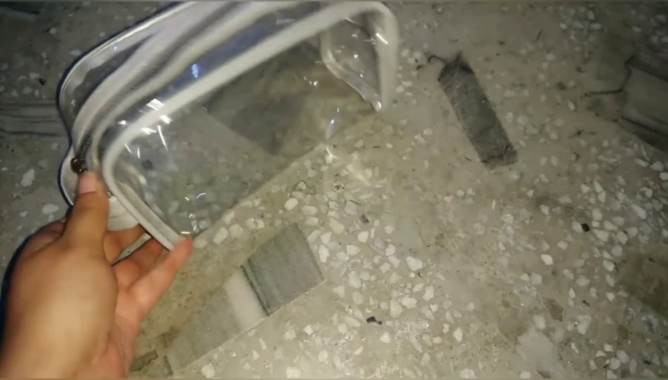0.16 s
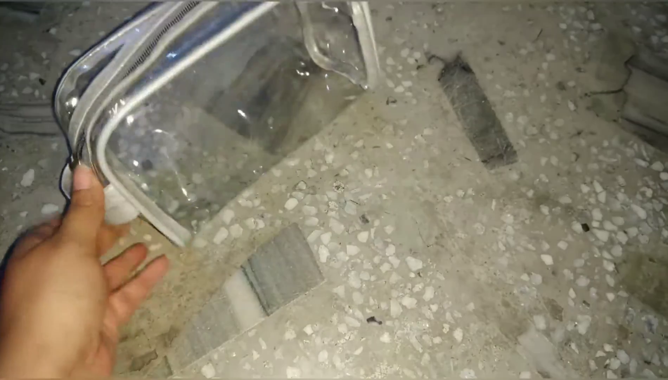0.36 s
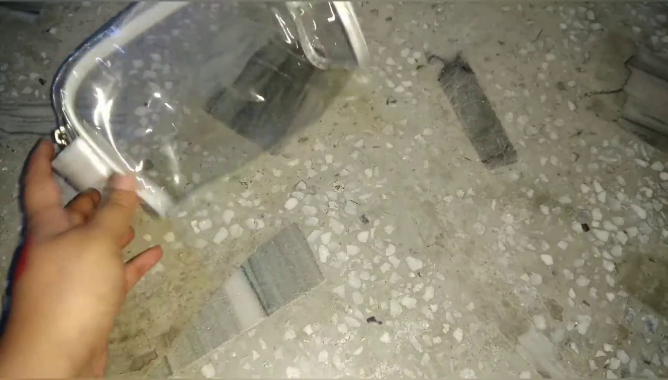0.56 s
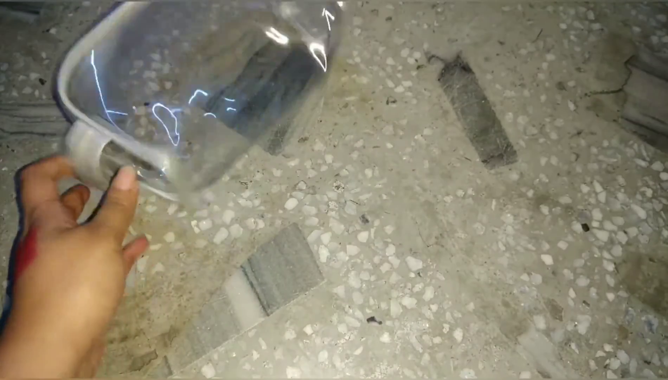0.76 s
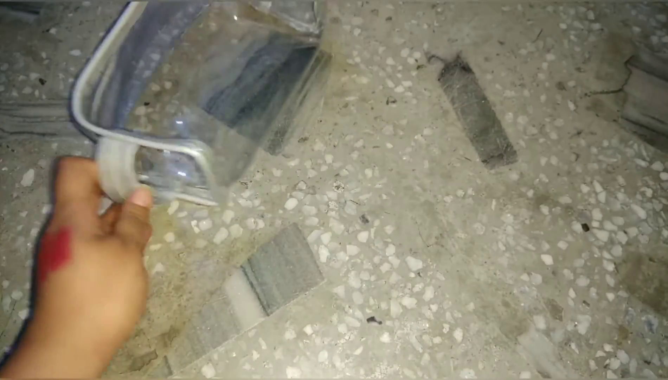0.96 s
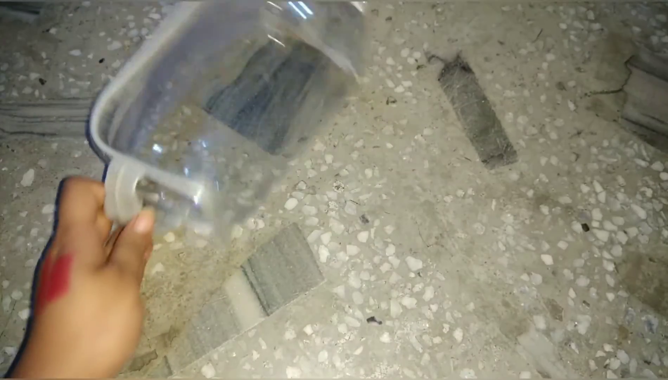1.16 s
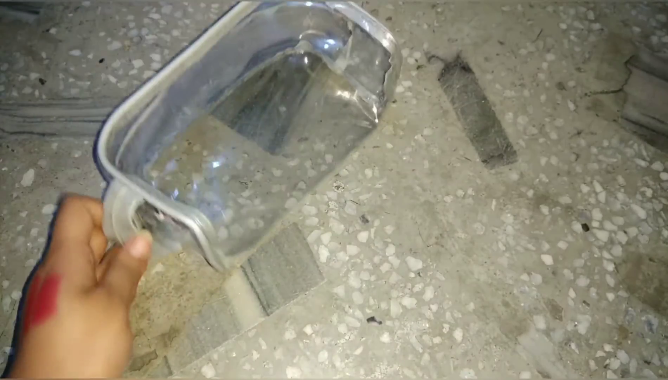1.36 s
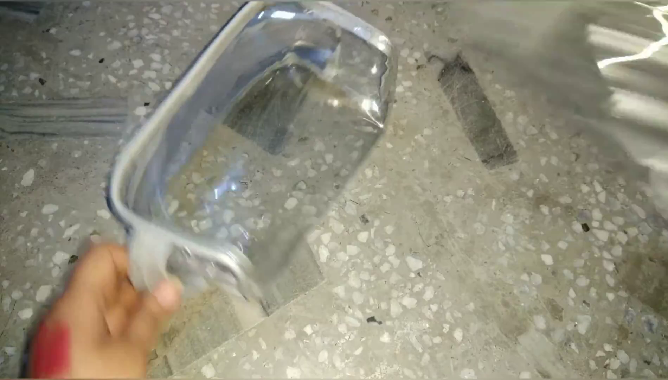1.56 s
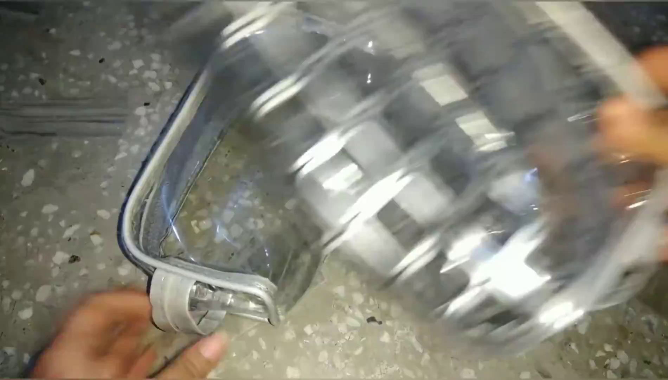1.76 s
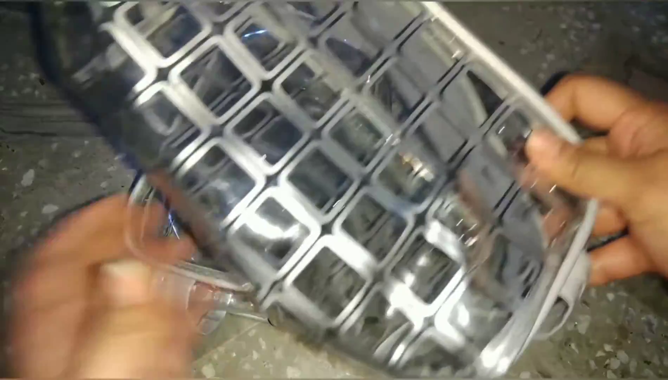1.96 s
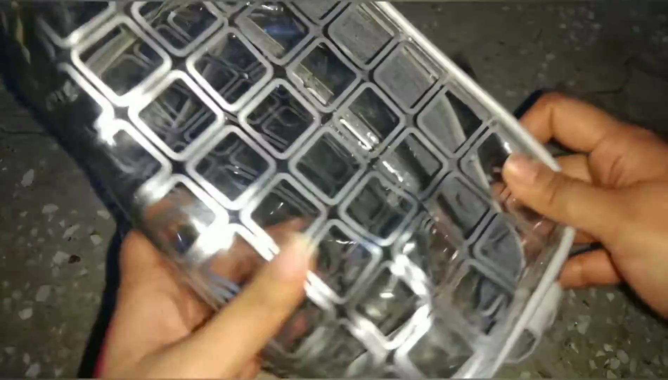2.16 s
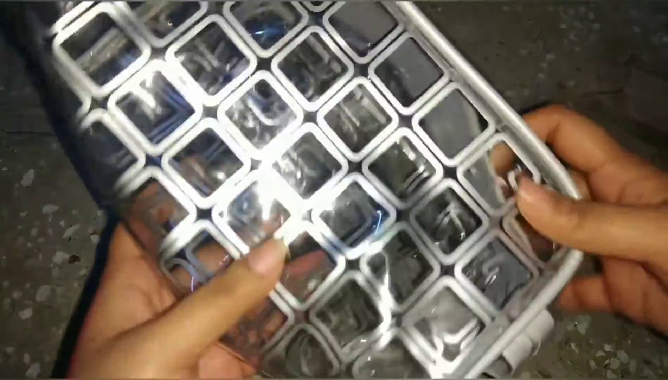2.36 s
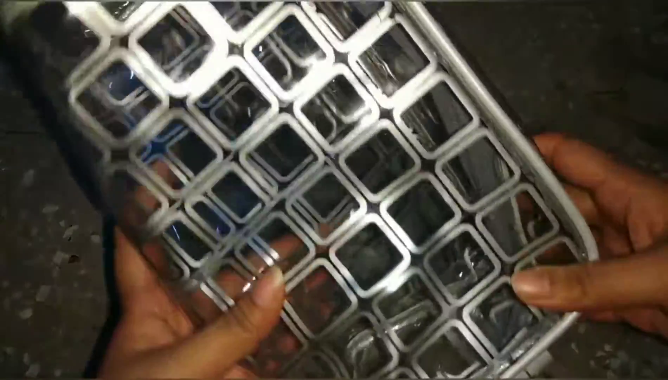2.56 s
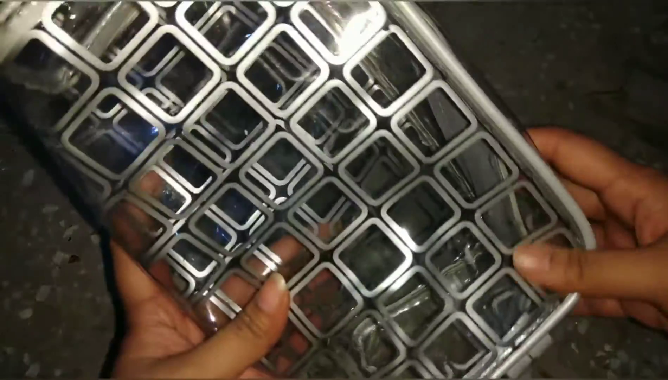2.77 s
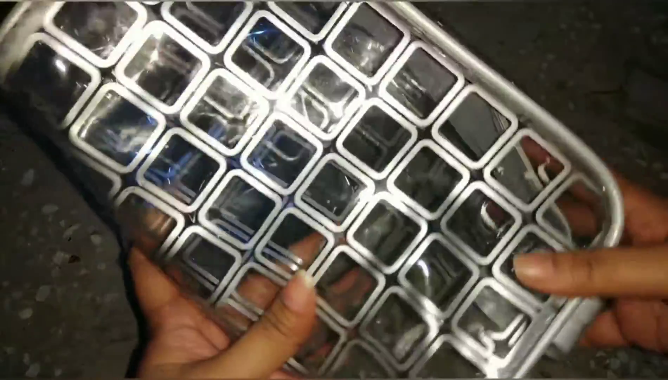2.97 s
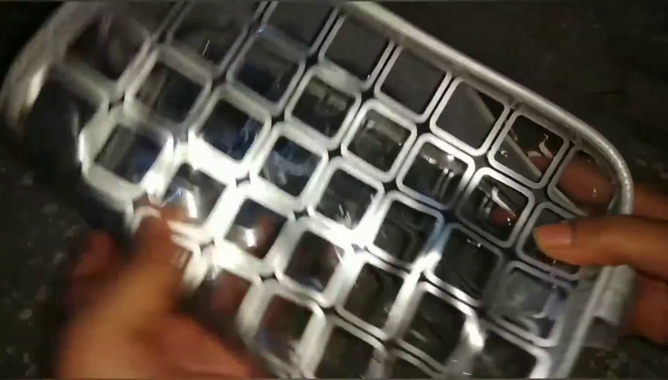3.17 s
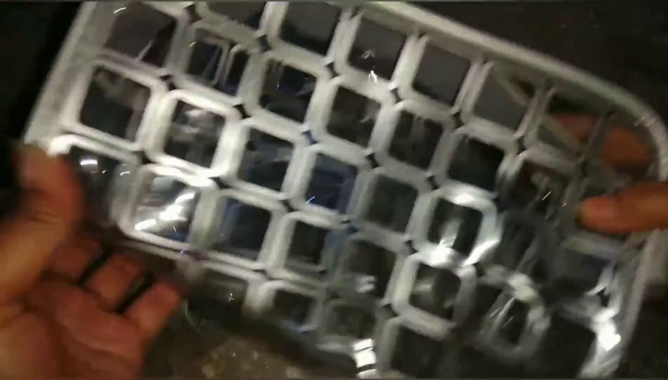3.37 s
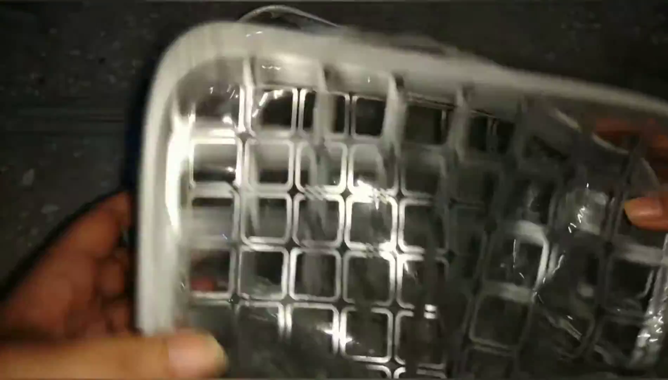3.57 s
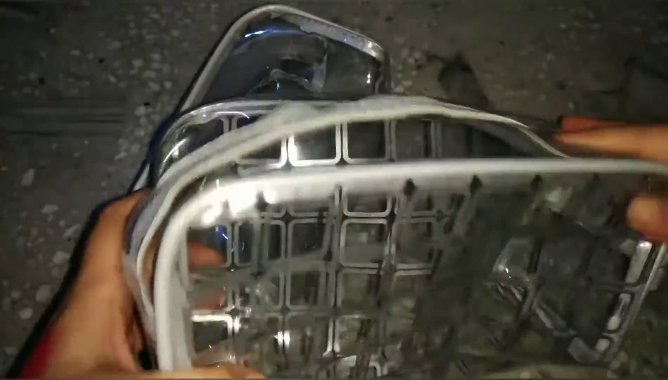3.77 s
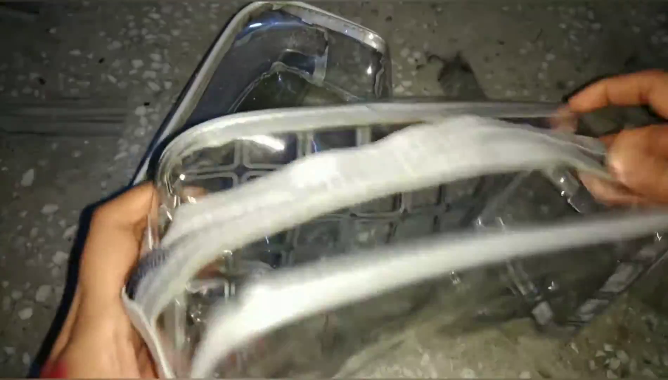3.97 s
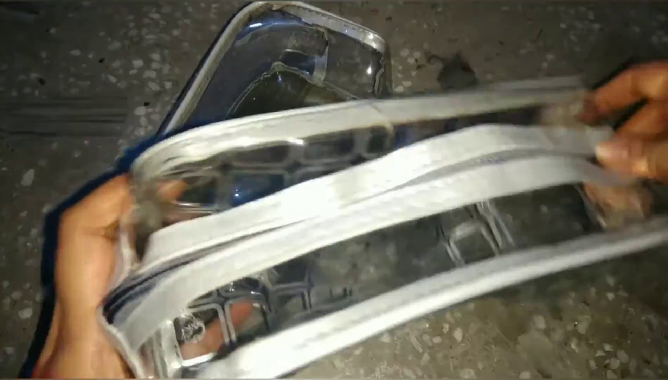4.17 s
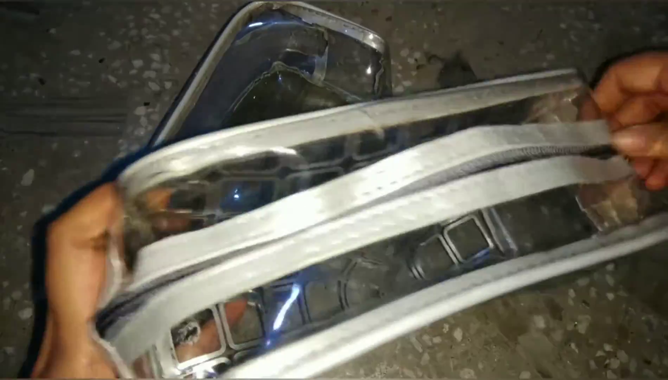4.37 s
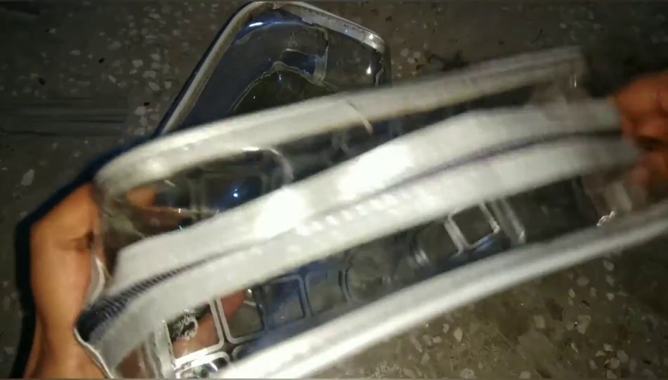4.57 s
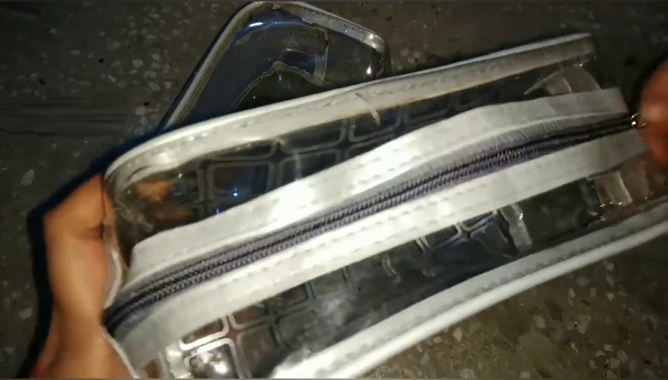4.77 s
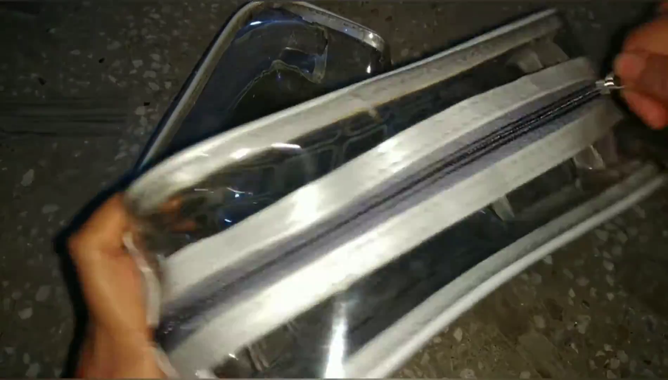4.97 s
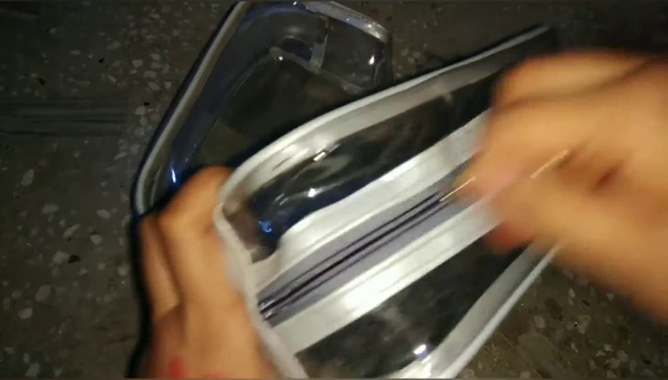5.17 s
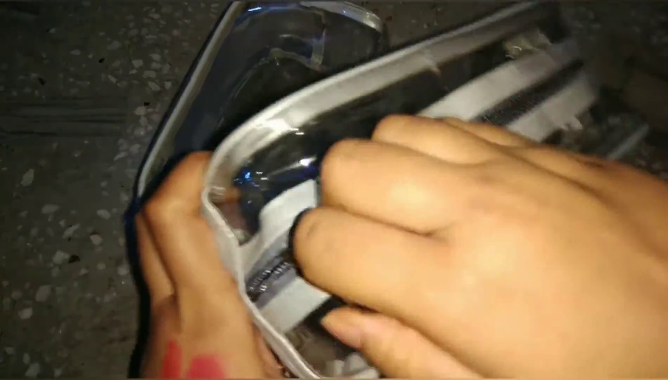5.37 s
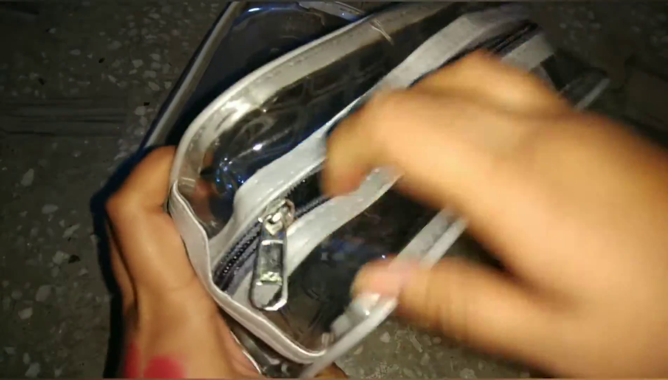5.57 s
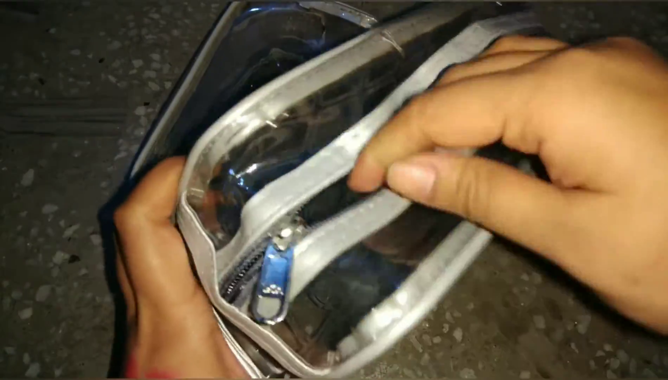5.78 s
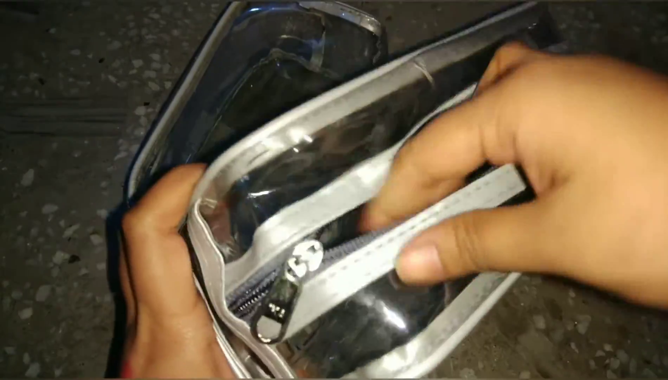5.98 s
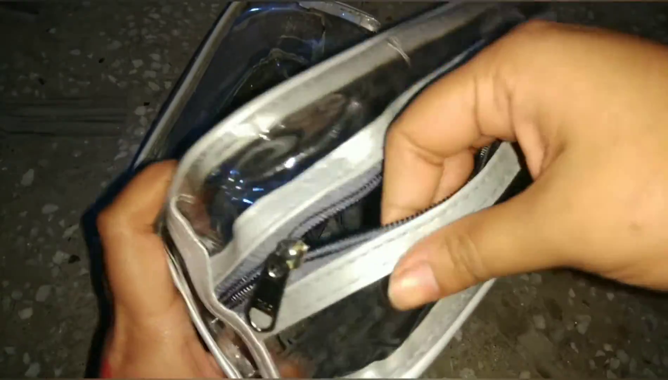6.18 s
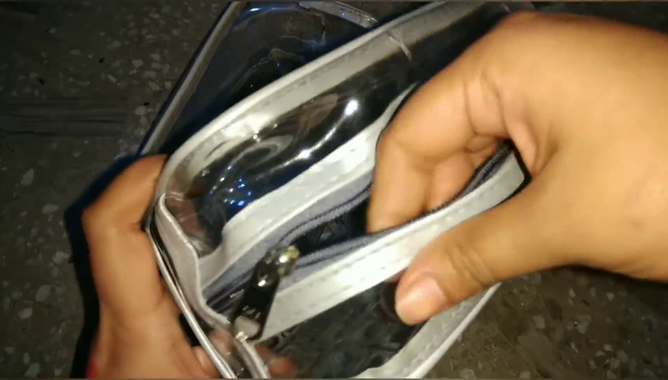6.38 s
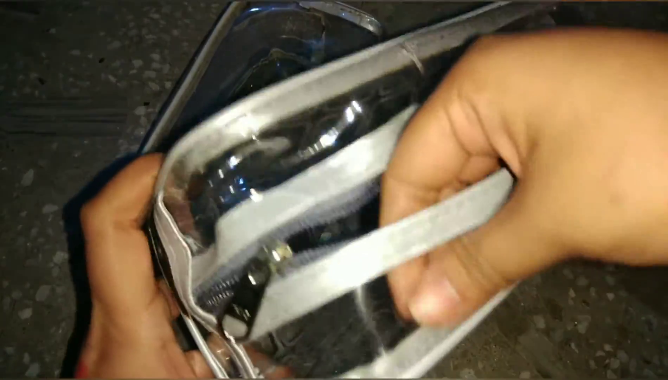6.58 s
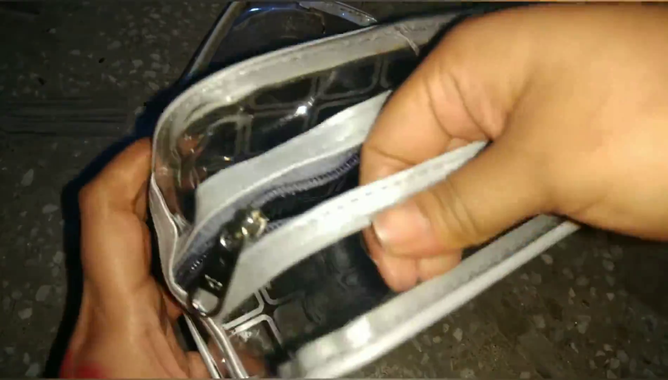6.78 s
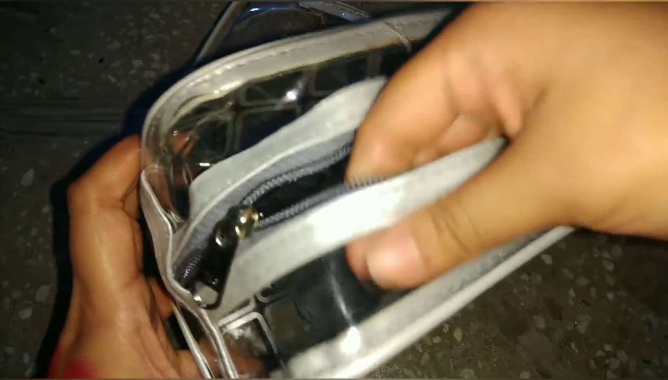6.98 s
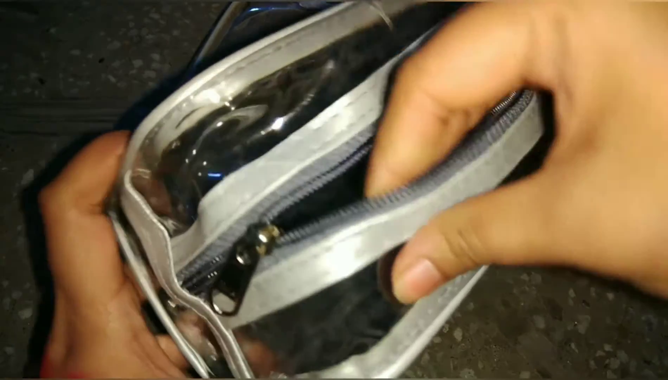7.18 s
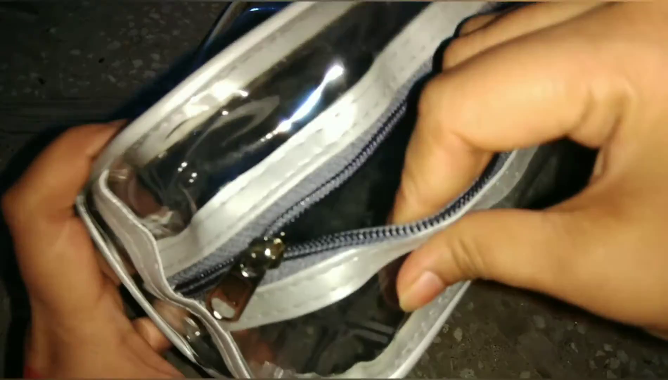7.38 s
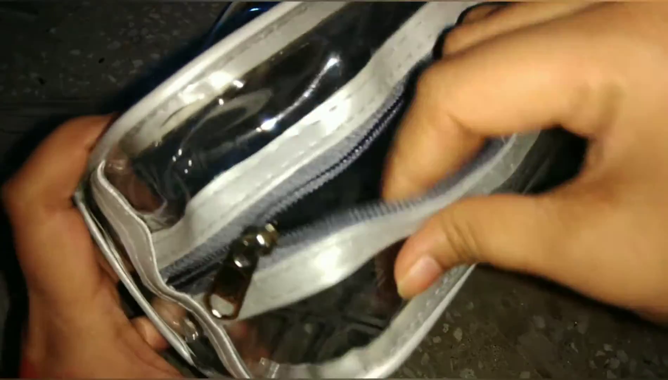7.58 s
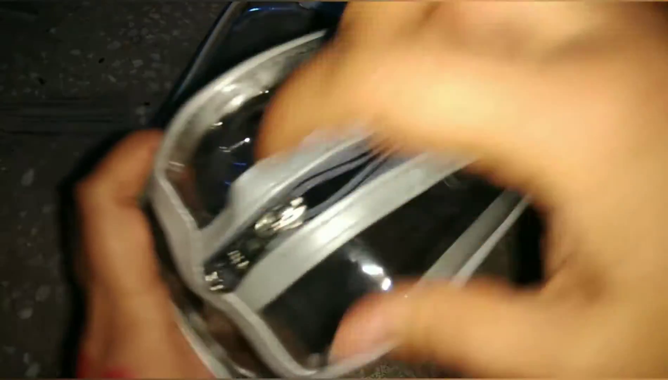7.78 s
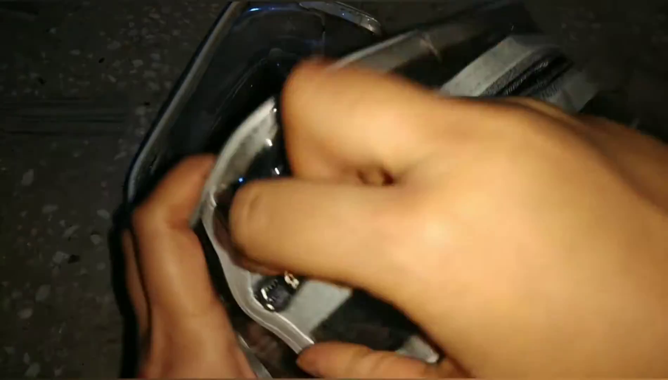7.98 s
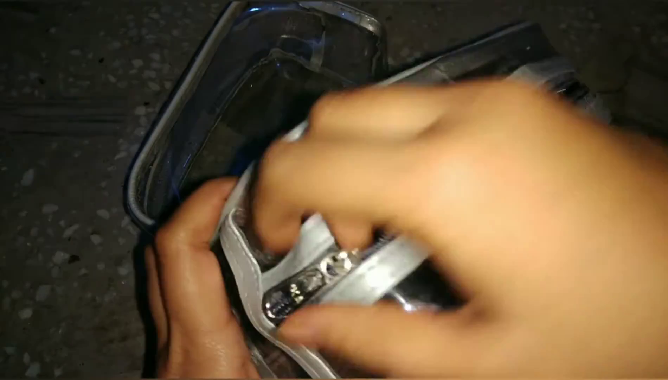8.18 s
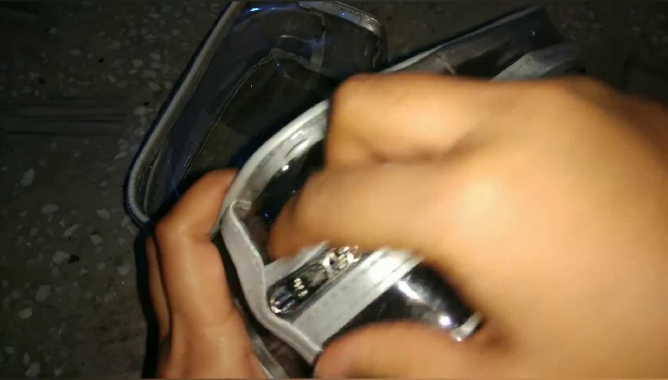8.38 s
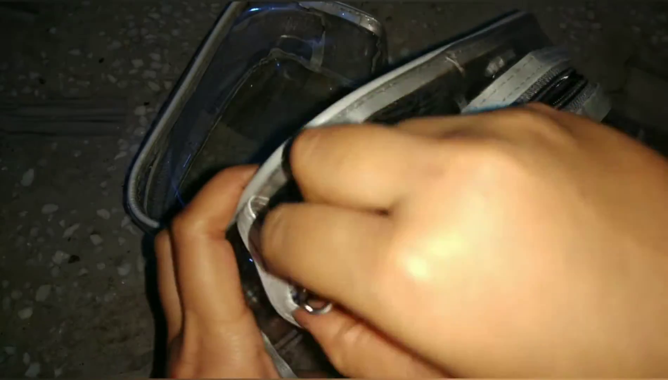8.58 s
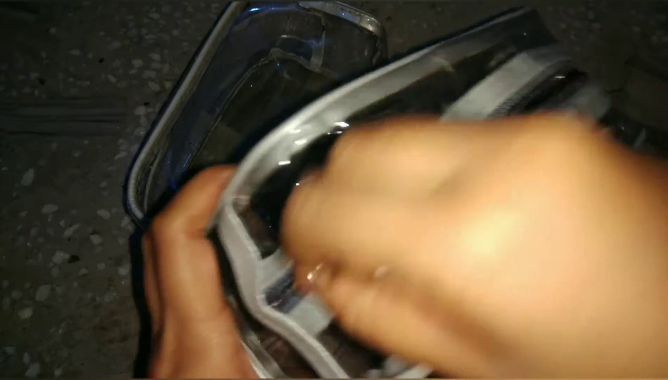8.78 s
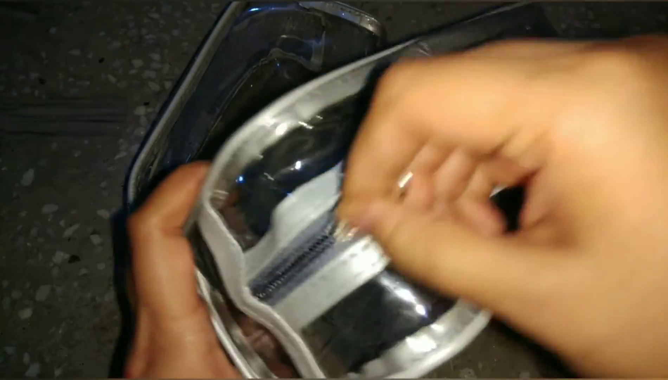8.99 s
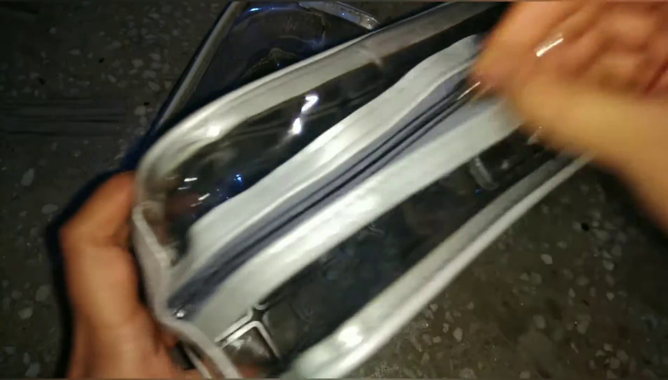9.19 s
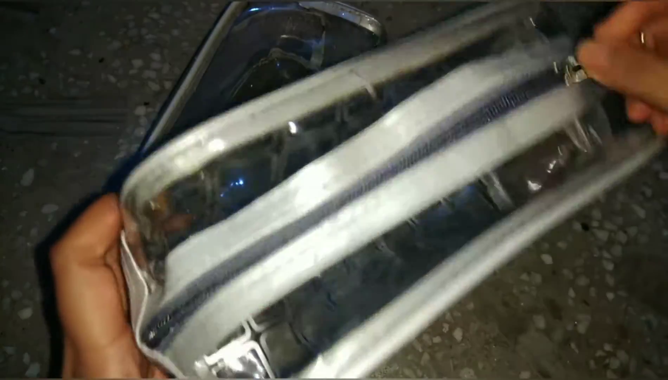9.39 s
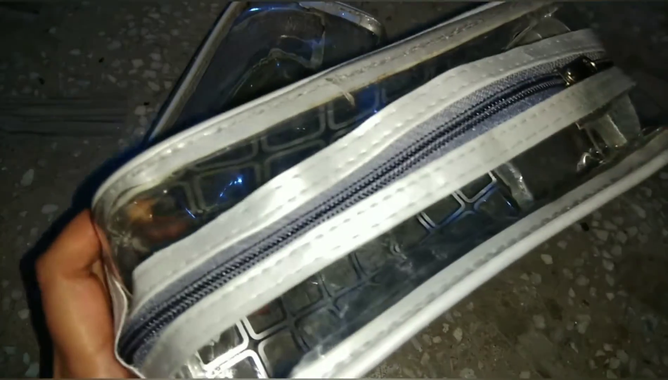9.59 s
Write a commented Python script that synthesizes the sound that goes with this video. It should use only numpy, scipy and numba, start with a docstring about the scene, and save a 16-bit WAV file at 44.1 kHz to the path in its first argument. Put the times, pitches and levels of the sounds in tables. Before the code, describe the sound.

A plastic pouch is dragged in uneven hissing shoves over a stone floor, then another is turned gently by hand with faint crinkles. Bright metal clinks lead to a short zip buzz, rising then slowing, followed by hard plastic snaps. After quieter rubbing and knocks, the zip buzzes again and stops with a high metallic tick. Close stereo phone pickup, short room reflections, a faint steady hum.

```python
"""In a small room with a low hum, clear plastic pouches are handled close to a phone.
One is dragged over the stone floor, and filtered noise makes its scrape. Another is turned in the hands:
noise makes the rubbing, and short fading tones make the film's pops and buckles.
Its coil zip is pulled open and shut: one kick per tooth makes a buzz that rises and falls with speed.
The metal pull tab clinks and skids on the slider, with noise bursts and very high tones."""
import sys
import numpy as np
from scipy import signal
from scipy.fft import rfft, irfft
from scipy.io import wavfile
from scipy.ndimage import map_coordinates
from numba import njit

SR = 44100
rng = np.random.default_rng(int(sys.argv[2]) if len(sys.argv) > 2 else 0)


def dump_mix(stems):
    """Bounce the given channels to the path in sys.argv[1] as a 16-bit WAV at rate SR."""
    frames = np.atleast_2d(stems).T  # one column per channel
    limited = np.clip(frames, -1, 1)  # hard clip at full scale
    pcm = np.round(limited * 32767).astype(np.int16)
    wavfile.write(sys.argv[1], SR, pcm)


N = 425565
TIME = np.arange(N) / SR


def amp(db):
    """Turn decibels into gain."""
    return 10 ** (np.asarray(db) / 20)


def unit(x):
    """Scale to an rms of one."""
    return x / np.sqrt(np.mean(x ** 2))


def swell(s, db):
    """Gain that follows a level curve and is silent outside it."""
    return amp(np.interp(TIME, s, db)) * (TIME > s[0]) * (TIME < s[-1])


def pan(db):
    """Left and right gains for a level difference."""
    return amp(np.array([[db], [-db]]) / 2)


def wander(rate):
    """Random values, `rate` new ones each second, joined by straight lines."""
    return np.interp(TIME * rate, np.arange(N), rng.standard_normal(N))


def colour(x, points, size=2048):
    """Shape the tone with a filter of unit energy drawn through (f/Hz, level/dB) points."""
    hz, db = np.transpose(points)
    grid = np.maximum(np.arange(size // 2 + 1) * SR / size, 1)
    curve_db = np.interp(np.log(grid), np.log(np.sort(hz)), db)
    # folding the cepstrum forward makes the filter respond only after its input
    cepstrum = irfft(np.log(amp(curve_db)))
    cepstrum[1:size // 2] *= 2
    cepstrum[size // 2 + 1:] = 0
    response = irfft(np.exp(rfft(cepstrum)))
    response /= np.linalg.norm(response)
    return signal.fftconvolve(x, response[None])[:, :x.shape[1]]


def noise(alike, size=N):
    """Noise at two microphone ports; `alike` is the share of power they have in common."""
    alike = np.clip(alike, 0, 1)
    shared = np.sqrt(alike) * rng.standard_normal(size)
    return shared + np.sqrt(1 - alike) * rng.standard_normal((2, size))


def add(out, s, sound):
    """Mix a short sound in at a time."""
    start = max(int(s * SR), 0)
    out[:, start:start + sound.shape[1]] += sound[:, :N - start]


def no_bass(x):
    """A small crease moves too little air to carry any bass."""
    return signal.lfilter(*signal.butter(2, 170, "high", fs=SR), x)


@njit
def resonate(x, hz, damping):
    """Resonance whose centre may move: it lets through a narrow band around that pitch."""
    y, band, low = np.empty(len(x)), 0., 0.
    for i in range(len(x)):
        g = np.tan(np.pi * hz[i] / SR)
        v = (band + g * (x[i] - low)) / (1 + g * (g + damping))
        band, low, y[i] = 2 * v - band, low + 2 * g * v, damping * v
    return y


# tone of the low drone: (f/Hz, relative level/dB)
HUM_TONE = [(18, -67.5), (30, -39.5), (90, -15), (134, -9.5), (184, -0.5), (210, -1.5), (227, -15.5),
            (374, -27), (512, -56.5), (866, -42.5), (1040, -53.5), (3000, -59.5), (13700, -55),
            (16000, -72.5)]


def hum(level_db):
    """A low, nearly steady drone, perhaps a fan: filtered noise that wavers a little."""
    waver = amp(wander(12))
    return unit(colour(noise(0.92), HUM_TONE)) * amp(level_db) * waver


def room(x, low_db, high_db, low_t60, high_t60, size=24000):
    """Hard floor and near walls return a short diffuse tail; t60 is its time to fall 60 dB, in s."""
    t = np.arange(size) / SR
    split_hz = 2500
    low = signal.lfilter(*signal.butter(2, split_hz, fs=SR), noise(0.45, size))
    high = signal.lfilter(*signal.butter(2, split_hz, "high", fs=SR), noise(0, size))
    tail = 0
    for band, db, t60 in ((low, low_db, low_t60), (high, high_db, high_t60)):
        decay = np.exp(-np.log(1000) * t / t60) * (t > .004)
        tail = tail + amp(db) * band * decay / np.linalg.norm(decay)
    return x + signal.fftconvolve(x, tail, axes=1)[:, :N]


# where the pouch is handled: (t/s, delay of the left port/s)
HAND_PLACE = [(1.7, .00006), (2.1, -.0001), (3.2, .00006), (4.2, -.00013), (4.9, -.00008), (5.3, .0001)]


def placed(x):
    """As the hands move from side to side, the sound reaches the left port earlier or later than the right."""
    lag_s = np.interp(TIME, *np.transpose(HAND_PLACE))
    left = map_coordinates(x[0], [(TIME - lag_s) * SR], order=5)
    return np.array([left, x[1]])


def flex(x, share=0.33, count=4):
    """Folds of the bending film reflect sound into each port by short paths that shift slowly."""
    index = np.arange(N)
    out = x.copy()
    for lag_s in np.geomspace(.0004, .0025, count):
        moving_lag = SR * lag_s * np.exp(.12 * wander(3.3))
        out += share * np.array([np.interp(index - moving_lag, index, port) for port in x])
    return out / np.sqrt(1 + count * share ** 2)


DRIFTS_PER_S = 14  # how often the drifting bands and the whisper take a new value


def drifting_bands(x, ring=0.92, drift=0.28, sharpness=8, count=8):
    """Several narrow bands of the rubbing noise drift in pitch and strength."""
    out = x.copy()
    for hz in np.geomspace(380, 3400, count):
        centre = np.minimum(hz * np.exp(drift * wander(DRIFTS_PER_S)), SR / 4)
        gain = ring * np.maximum(1 + wander(DRIFTS_PER_S), 0)
        out += gain * np.array([resonate(port, centre, 1 / sharpness) for port in x])
    return out


# a stroke's rise and fall are the times it takes to cover STROKE_DROP_DB
STROKE_DROP_DB, STROKE_ROUNDNESS = 13.5, 1.57


def strokes(rows):
    """One gain per level column: each stroke swells and fades alike, and overlapping ones add in power."""
    power = np.zeros((len(rows[0][3:]), N))
    for s, rise_s, fall_s, *levels_db in rows:
        near = (TIME > s - 4 * rise_s) & (TIME < s + 4 * fall_s)
        away = np.maximum((s - TIME[near]) / rise_s, (TIME[near] - s) / fall_s)
        level_db = np.array(levels_db)[:, None] - STROKE_DROP_DB * away ** STROKE_ROUNDNESS
        power[:, near] += amp(level_db) ** 2
    return np.sqrt(power)


# fingertips glide over smooth film: (peak t/s, rise/s, fall/s, level before flutter/dB)
FINGER_GLIDES = [(.54, .08, .07, -52.5), (1.9, 0.25, 0.24, -69.5), (2.22, 0.25, 0.3, -66)]


def glides(low_hz):
    """Skin gliding lightly on smooth film gives only a very high whisper."""
    band = signal.butter(4, [low_hz, 15700], "band", fs=SR, output="sos")
    whisper = unit(signal.sosfilt(band, noise(0)))
    return whisper * strokes(FINGER_GLIDES) * amp(2 * wander(DRIFTS_PER_S))


def crease(hz, cycles, size=1024):
    """A crease lets go and rings, with a weaker overtone; it falls 60 dB in the given cycles."""
    turns = hz * np.arange(size) / SR
    ring = np.sin(2 * np.pi * turns) + 0.26 * np.sin(2 * np.pi * 2.3 * turns)
    return ring * np.exp(-np.log(1000) * turns / cycles)


def crackle(rate, centre_hz, octaves, spread_db, cycles):
    """Small creases pop at random, each at its own pitch, strength and side."""
    out = np.zeros((2, N))
    count = int(rate * N / SR)
    for when, pitch, size, side in rng.random((count, 4)):
        hz = centre_hz * 2 ** (octaves * (pitch - .5))
        ports = pan(12 * (side - .5))
        add(out, when * N / SR, amp(spread_db * size) * ports * crease(hz, cycles))
    return unit(no_bass(out))


# shoves of the pouch over the floor, then rubs of the fingers on the film:
# (peak t/s, rise/s, fall/s, hiss level before trim/dB, film flutter level before trim/dB)
FLOOR_DRAGS = [(0.0, .01, 0.051, -48, -54.5), (.19, 0.14, 0.099, -59.5, -59.5),
               (.39, 0.059, 0.025, -58, -60), (.6, 0.22, 0.6, -61.5, -61.5), (.737, 0.03, 0.017, -41, -44),
               (.803, 0.072, 0.013, -44.5, -52.5), (.95, 0.19, 0.065, -51, -53.5),
               (1.04, 0.061, 0.083, -36.5, -49.5), (1.15, 0.092, 0.17, -44.5, -48.5),
               (1.43, 0.15, 0.1, -45, -52), (1.54, 0.23, 0.17, -43.5, -55.5), (1.68, 0.26, 0.082, -71, -57)]
FINGER_RUBS = [(1.82, 0.056, 0.15, -79, -68.5), (2.12, 0.16, 0.17, -78.5, -67.5),
               (2.3, 0.23, 0.11, -75.5, -67), (2.49, 0.026, 0.063, -83.5, -70.5),
               (2.995, 0.037, 0.049, -68.5, -76), (3.17, 0.041, 0.047, -64.5, -68.5),
               (3.3, 0.17, 0.046, -74, -79.5), (3.43, 0.011, 0.021, -68, -74),
               (3.53, 0.008, 0.045, -67, -63), (3.61, 0.11, 0.084, -61, -67.5),
               (3.81, 0.051, 0.041, -49.5, -57.5), (3.93, 0.24, 0.14, -63.5, -65.5),
               (4.07, 0.051, 0.022, -54.5, -63.5), (4.18, 0.13, 0.062, -60.5, -64),
               (4.365, 0.099, 0.051, -57, -58.5), (4.53, 0.082, 0.073, -62.5, -59.5),
               (4.68, 0.22, 0.16, -62, -64.5), (5.6, 0.018, 0.13, -58, -57), (5.91, 0.23, 0.15, -62, -59),
               (6.21, 0.085, 0.099, -70.5, -63), (6.43, 0.02, 0.0083, -47, -48.5),
               (6.44, 0.096, 0.032, -64.5, -64), (6.72, 0.095, 0.13, -92.5, -86.5),
               (6.98, 0.06, 0.078, -52.5, -56.5), (7.2, 0.22, 0.056, -68.5, -68.5),
               (7.607, 0.023, 0.12, -60, -62), (7.7, 0.077, 0.15, -84, -61.5),
               (7.85, 0.05, 0.11, -67.5, -68), (8.11, 0.047, 0.042, -68.5, -65),
               (8.2, 0.047, 0.022, -69, -70.5), (8.39, 0.032, 0.075, -70.5, -77.5),
               (8.55, 0.039, 0.045, -59, -57.5), (8.64, 0.021, 0.013, -52, -48.5),
               (8.705, 0.025, 0.047, -55.5, -51.5), (8.82, 0.11, 0.029, -70, -67.5),
               (9.53, 0.72, 0.15, -66, -69)]
# tones of the floor scrape and dragged pouch, then of the finger hiss and film: (f/Hz, relative level/dB)
SCRAPE_TONE = [(710, -31), (1150, -4.5), (1830, -2), (2500, -8), (4100, -3), (6510, -4.5), (8350, 0),
               (12600, 2.5), (15200, 0), (16000, -32.5)]
DRAGGED_POUCH_TONE = [(41, -49.5), (70, -27), (88, -8), (149, -4.5), (187, 9), (290, -8), (423, -1),
                      (657, -2), (836, 0.5), (1300, -8.5), (2600, -28), (3380, -22.5), (5720, -120)]
FINGER_HISS_TONE = [(710, -14.5), (1200, -4.5), (1460, -11), (1570, -0.5), (1790, 2.5), (2180, -8),
                    (2890, -5.5), (3590, -1.5), (4410, -2), (6580, -0.5), (11700, 4.5), (15200, 3),
                    (16000, -19.5)]
FILM_TONE = [(150, -33.5), (250, -3), (390, -1), (526, -3.5), (647, 3), (885, -6.5), (1040, -1.5),
             (1340, -20), (1810, -16.5), (1980, -16), (2600, -22.5), (3380, -56.5), (5720, -120)]
# the film creases less once it is held taut: (t/s, change of the pops' level/dB)
FILM_SLACK = [(4.7, -2), (5.6, -5)]


def rubbing(rows, hiss_colour, film_colour, hiss_db, film_db, pop_rate, pop_hz, pop_db, catch_db, pan_db):
    """Tiny catches of a sliding surface hiss; creases in the loose film let go one by one."""
    sliding, flutter = strokes(rows)
    catches = unit(amp(catch_db * wander(110)))
    hiss = colour(noise(0.059) * catches, hiss_colour) * sliding * amp(hiss_db)
    film = colour(noise(0.97) * catches, film_colour) * flutter * amp(film_db)
    pops = crackle(pop_rate, pop_hz, octaves=3, spread_db=29.0, cycles=5.9) * flutter
    pops = pops * amp(pop_db + np.interp(TIME, *np.transpose(FILM_SLACK)))
    return flex(drifting_bands(hiss * pan(pan_db) + film)) + pops


# the film buckles or is knocked, or the zip's first teeth and short creaks snap:
# (t/s, level before trim/dB, crack against thud before trim/dB, ring f/Hz)
SNAPS_AND_KNOCKS = [(0.163, -37, -9, 260), (0.384, -33, -13, 442), (0.73, -22, -1.5, 794),
                    (0.776, -40, -6, 1050), (0.807, -35, 8, 465), (0.887, -38, -4, 585),
                    (0.95, -39, -10, 1500), (1.032, -48, 6, 2820), (1.071, -34, -3, 1900),
                    (1.204, -36, -14, 775), (1.511, -35.5, 4, 895), (2.058, -48, -6, 363),
                    (2.128, -43, -5, 1230), (2.153, -40.5, -3, 684), (2.309, -48.5, -10, 1070),
                    (2.4431, -51.5, -6, 1300), (2.485, -55, -9, 1196), (2.877, -59.5, -8.5, 880),
                    (2.991, -51, -2, 400), (3.134, -53, -17, 231), (3.523, -46.5, -2, 1100),
                    (3.937, -53, -14, 850), (4.136, -38.5, 9, 685), (4.372, -37.5, -14, 1200),
                    (4.518, -48, -17, 715), (4.624, -36.5, 5.5, 1840), (4.835, -38, 3, 730),
                    (5.286, -24, -4.5, 520), (5.435, -26, 7, 558), (5.52, -21, 0.5, 1180),
                    (5.53, -28.5, -1, 1276), (5.54, -28.5, 0.5, 1720), (5.6425, -33, -19, 657),
                    (5.786, -43, -22, 910), (5.823, -41.5, -14, 685), (5.904, -45.5, 5.5, 370),
                    (6.154, -51, -24, 676), (6.431, -32, -3, 636), (7.624, -35.5, -22, 404),
                    (7.65, -35, -4, 664), (7.775, -45, -30, 332), (8.543, -37, -7, 1080),
                    (8.561, -39, 4, 357), (8.632, -33.5, 1, 400), (8.696, -35, -21, 455),
                    (8.712, -35, -11, 387), (8.838, -40.5, -13, 640), (8.944, -32.5, -12, 336),
                    (8.959, -30.5, -5, 380), (9.31, -31, -13, 810), (9.325, -30, -20, 432),
                    (9.45, -27.5, 3, 710)]
# tone of the thud: (f/Hz, relative level/dB)
THUD_TONE = [(71, -41), (120, -3), (394, -4), (740, -6.5), (1040, -3.5), (1270, -18.5), (1590, -21),
             (1730, -12.5), (1980, -14.5), (2460, -15.5), (2730, -18.5), (4000, -23), (5200, -57),
             (8800, -120)]


def knocks(thud_db, crack_db, ring_db, ring_cycles, rise_s, t60, size=8192):
    """Film or zip teeth snap, or the film is knocked: a short crack, a fading ring and a damped thud."""
    t = np.arange(size) / SR
    thuds, cracks, rings = np.zeros((3, 2, N))
    push = (1 - np.exp(-t / rise_s)) * np.exp(-np.log(1000) * t / t60)
    for s, db, bright_db, hz in SNAPS_AND_KNOCKS:
        add(thuds, s, amp(db + thud_db) * push * noise(1.0, size))
        add(cracks, s, amp(db + bright_db + crack_db) * push * noise(0.036, size))
        add(rings, s, amp(db + ring_db) * crease(hz, ring_cycles)[None])
    return colour(thuds, THUD_TONE) + colour(cracks, FINGER_HISS_TONE) + no_bass(rings)


# the metal tab meets the slider: (t/s, level before trim/dB, left minus right level/dB)
TAB_CLINKS = [(2.1272, -49, 18), (2.215, -47, 6), (2.2296, -44, 8), (2.285, -48, 18), (2.409, -50.5, 24),
              (2.468, -51.5, 17), (4.137, -28, 13.5), (4.148, -23.5, 6.5), (4.566, -24, 6),
              (4.5707, -17, 7), (4.6182, -19, 11.5), (4.639, -30, 10), (4.8766, -30, 23), (5.421, -24.5, 4),
              (5.438, -17, 2), (5.5238, -21, 6), (5.54, -32, 12), (7.669, -43, 4), (7.6968, -42.5, -3),
              (8.114, -45, -13), (8.6384, -45, 10), (9.4567, -25, 21), (9.4773, -36, 13)]
# tone of the scrape and blow: (f/Hz, relative level/dB)
TAB_TONE = [(1500, -22.5), (3000, -26.5), (5000, -23), (8000, -13.5), (11600, -2), (14600, -2), (15300, 8),
            (15750, -21.5), (16500, -25)]
# ringing pitches of the tab: (f/Hz before a small random shift, relative level/dB, time to fall 60 dB/s)
TAB_RINGS = [(8130, -14.5, 0.038), (15500, -5, 0.07), (15300, -12, .05)]


def clinks(blow_db, ring_db, scrape_db, scrape_s, blow_s, size=8192):
    """The tab scrapes along its loop, strikes the slider and rings very high."""
    lead_s = .03  # room for the scrape before the blow
    t = np.arange(size) / SR - lead_s
    after = np.maximum(t, 0)
    blows, rings = np.zeros((2, 2, N))
    scrape = amp(scrape_db) * np.exp(-abs(t) / scrape_s)
    contact = np.where(t < 0, scrape, np.exp(-after / blow_s))
    for s, db, pan_db in TAB_CLINKS:
        ports = unit(pan(pan_db))
        add(blows, s - lead_s, amp(db + blow_db) * ports * contact * noise(0.07, size))
        for hz, mode_db, t60 in TAB_RINGS:
            ring_hz = hz * (1 + 0.003 * rng.standard_normal())
            phase = 2 * np.pi * (ring_hz * t + rng.random((2, 1)))
            ring = np.sin(phase) * np.exp(-np.log(1000) * after / t60) * (t > 0)
            add(rings, s - lead_s, amp(db + ring_db + mode_db) * ports * ring)
    return colour(blows, TAB_TONE) + rings


# the tab skids on the slider: (start t/s, length/s, level before trim/dB, left minus right level/dB)
TAB_SQUEALS = [(2.9125, .003, -35.5, 13), (2.945, .003, -32.5, 14), (4.572, .0017, -11.5, 19),
               (4.623, .0016, -5.5, 15), (5.5214, .005, -5, -6), (9.454, .0048, -4, 9)]
SQUEAL_HZ = 15200  # near the tab's highest ringing pitches


def squeals(squeal_db, rough, bite_s, size=1024):
    """The tab bites at once and friction keeps its ring going until the contact eases."""
    t = np.arange(size) / SR
    out = np.zeros((2, N))
    for s, length_s, db, pan_db in TAB_SQUEALS:
        contact = (1 - np.exp(-t / bite_s)) * np.exp(-(t / length_s) ** 2)
        phase = 2 * np.pi * (SQUEAL_HZ * t + rng.random((2, 1)))
        phase = phase + rough * np.cumsum(noise(0, size), axis=1)
        add(out, s, amp(db + squeal_db) * unit(pan(pan_db)) * contact * np.sin(phase))
    return out


# the two pulls of the slider: (t/s, teeth per second f/Hz before jitter, tooth kick level before trim/dB,
# grinding level before trim/dB, panel hum level at the tooth rate/dB, at its octave/dB, both before flutter)
OPENING_PULL = [(4.82, 139.2, -49, -62, -61, -55), (4.842, 170.4, -37, -52, -51, -53),
                (4.94, 249.1, -35.5, -48.5, -46.5, -51.5), (4.99, 373.7, -37.5, -44, -44.5, -30.5),
                (5.025, 453.6, -40, -43, -43.5, -35), (5.075, 491.6, -38, -42, -45.5, -35.5),
                (5.11, 476, -32.5, -44.5, -44, -36.5), (5.147, 437.4, -37, -39.5, -37, -35.5),
                (5.183, 421.3, -32.5, -43.5, -43, -33), (5.215, 337, -36, -46, -41, -55),
                (5.245, 231, -38, -49, -38.5, -37.5), (5.263, 174.7, -53.5, -53, -55.5, -52.5),
                (5.335, 141, -43, -59.5, -56, -58.5), (5.41, 103.4, -48, -55, -62.5, -62.5)]
SHUTTING_PULL = [(8.95, 65.8, -40, -63, -65, -54), (8.972, 160.3, -37.5, -49, -44, -37),
                 (9.005, 221, -31.5, -44.5, -29, -59), (9.05, 285.4, -36, -44, -46, -54),
                 (9.075, 315, -38.5, -51.5, -32.5, -54), (9.097, 288.2, -42, -46.5, -55, -52),
                 (9.111, 329, -35, -49.5, -29.5, -29), (9.135, 368, -41, -45, -25, -34),
                 (9.163, 330.5, -35.5, -45.5, -29.5, -62), (9.205, 349.9, -36, -46.5, -28, -37),
                 (9.228, 355.4, -39, -43.5, -30, -43), (9.241, 300.6, -34.5, -41.5, -38, -31.5),
                 (9.272, 288.8, -41, -45, -53, -38), (9.297, 194, -42, -52, -33.5, -39),
                 (9.315, 160, -47, -58, -48, -58), (9.335, 108, -61, -69, -64, -67)]
# tones of the zip's body, its grinding teeth and its ticks: (f/Hz, relative level/dB)
ZIP_BODY_TONE = [(35, -72), (60, -33), (215, 5), (288, -4.5), (375, 9.5), (501, 1.5), (610, 6.5),
                 (687, 5.5), (1400, -4), (1820, -54), (3080, -120)]
ZIP_RASP_TONE = [(600, -29.5), (1150, 3.5), (1400, 2), (1650, 4.5), (1950, 0.5), (2200, -1), (2650, -4.5),
                 (3500, -16), (6000, -27.5)]
ZIP_TICK_TONE = [(1760, -16), (3000, -3), (4170, -8), (8230, -8.5), (9800, -7), (12600, 0.5), (15400, -0.5),
                 (16100, -31.5)]


def zip_pull(rows, kick_db, rasp_db, tick_db, low_pan_db, tick_pan_db, jitter, slip, uneven_db, tick_s,
             tone_blur, rasp_grit, from_hz, to_hz, span_db):
    """Each tooth snaps through the slider and kicks the film; at speed the kicks merge into a tone."""
    s, hz, force_db, grind_db, tone_db, octave_db = np.transpose(rows)
    speed = np.interp(TIME, s, hz)
    # a slow slider stumbles from tooth to tooth, a fast one runs more evenly
    stumble = np.minimum(300 / speed, 1.7)
    rate = speed * np.exp(jitter * stumble * wander(130))
    turns = np.cumsum(rate) / SR
    # every tooth lets go a little early or late, which blurs the upper harmonics
    release = turns + slip * stumble * wander(400)
    release = np.maximum.accumulate(np.maximum(release, 0))
    tooth = release.astype(int)
    since = release % 1 / rate
    strength = amp(uneven_db * stumble * rng.standard_normal(N)[tooth])
    kicks = np.diff(tooth, prepend=0) * np.sqrt(SR / rate)
    grind = np.exp(-since / 0.0075) * noise(0.69)
    body = colour((kicks + 0.88 * grind) * strength, ZIP_BODY_TONE)
    body = body * swell(s, force_db + kick_db)
    # now and then a tooth catches, and rasps and ticks far louder
    catch = unit(amp(2.88 * rng.exponential(size=N)))[tooth]
    scrape = np.exp(-since / 0.00057) * noise(0.44)
    rasp = colour((kicks + rasp_grit * scrape) * strength * np.sqrt(catch), ZIP_RASP_TONE)
    rasp = rasp * swell(s, grind_db + rasp_db)
    # the span of film beside the slider shortens as it travels, so its resonance climbs
    end_turns = np.interp([s[0], s[-1]], TIME, turns)
    travel = np.interp(turns, end_turns, [0, 1])
    span_hz = from_hz * (to_hz / from_hz) ** travel
    rasp = rasp + amp(span_db) * np.array([resonate(port, span_hz, 0.14) for port in rasp])
    # the whole panel pumps at the tooth rate and its octave, and growls when the teeth come unevenly
    phase = 2 * np.pi * turns + tone_blur * stumble * wander(220)
    pumping = np.sin(phase) * swell(s, tone_db) + np.sin(2 * phase) * swell(s, octave_db)
    pumping = pumping * amp(1.5 * stumble * wander(120))
    snap = (np.exp(-since / tick_s) * catch + 0.4) / np.sqrt(rate * tick_s)
    ticks = flex(colour(snap * noise(0.1), ZIP_TICK_TONE)) * swell(s, grind_db + tick_db)
    return (body + rasp + pumping) * pan(low_pan_db) + ticks * pan(tick_pan_db)


def scene():
    """Drag, handling, two pulls of the zip and the tab's clinks, in the humming room."""
    pouch = glides(low_hz=10300)
    pouch += rubbing(FLOOR_DRAGS, SCRAPE_TONE, DRAGGED_POUCH_TONE, hiss_db=1, film_db=-3,
                     pop_rate=280, pop_hz=1646, pop_db=-1.0, catch_db=3.0, pan_db=1.5)
    pouch += rubbing(FINGER_RUBS, FINGER_HISS_TONE, FILM_TONE, hiss_db=2.0, film_db=-2,
                     pop_rate=110, pop_hz=1200, pop_db=-4.0, catch_db=2.5, pan_db=0.5)
    pouch += knocks(thud_db=-4.5, crack_db=-5.0, ring_db=-4.0, ring_cycles=13, rise_s=0.0013, t60=0.027)
    pouch += zip_pull(OPENING_PULL, kick_db=-6.5, rasp_db=-2.0, tick_db=0.5, low_pan_db=0.0, tick_pan_db=1.0,
                      jitter=.04, slip=.075, uneven_db=1.5, tick_s=0.00039, tone_blur=0.5, rasp_grit=1.6,
                      from_hz=1500, to_hz=2050, span_db=-10)
    pouch += zip_pull(SHUTTING_PULL, kick_db=-4.0, rasp_db=-0.5, tick_db=1, low_pan_db=-1, tick_pan_db=0.0,
                      jitter=0.03, slip=.065, uneven_db=2.5, tick_s=0.0011, tone_blur=0.16, rasp_grit=0.78,
                      from_hz=490, to_hz=1950, span_db=3.5)
    tab = clinks(blow_db=-0.5, ring_db=-8.0, scrape_db=-7.5, scrape_s=0.0037, blow_s=0.0019)
    tab += squeals(squeal_db=-10.5, rough=0.0238, bite_s=.0002)
    # the tab is nearest to the phone and so sounds driest
    tab = room(tab, low_db=-6, high_db=-12, low_t60=.3, high_t60=.3)
    pouch = room(placed(pouch), low_db=-6.0, high_db=-4, low_t60=0.37, high_t60=0.28)
    return hum(level_db=-64) + pouch + tab


TOP_HZ = 16500  # highest pitch the phone passes


def record(dry):
    """The phone cuts the top of the treble with a steep filter."""
    return signal.sosfilt(signal.ellip(8, .2, 70, TOP_HZ, fs=SR, output="sos"), dry)


dry = scene()
out = record(dry)
dump_mix(out)
```